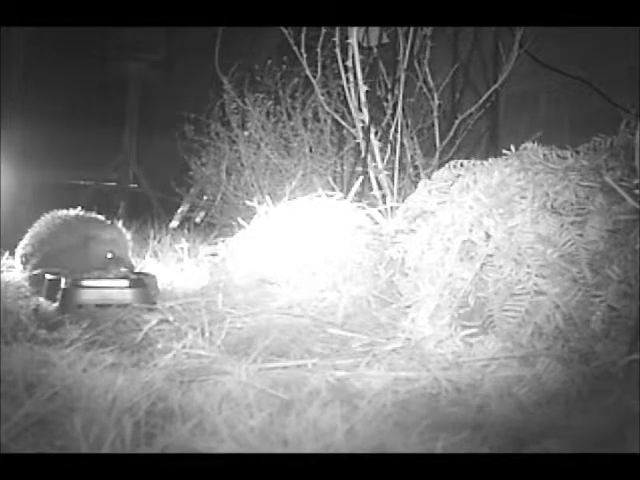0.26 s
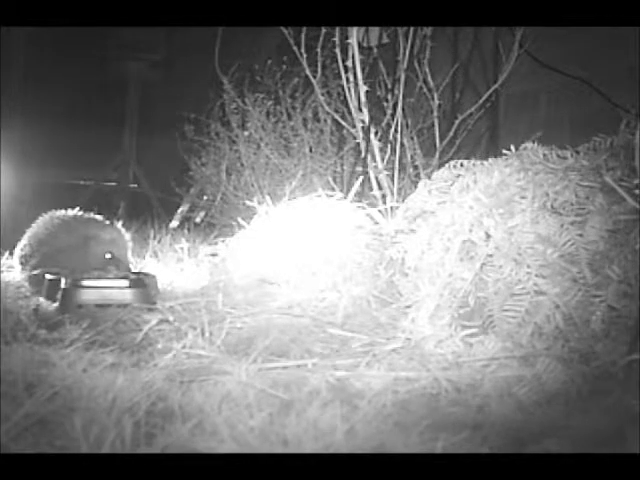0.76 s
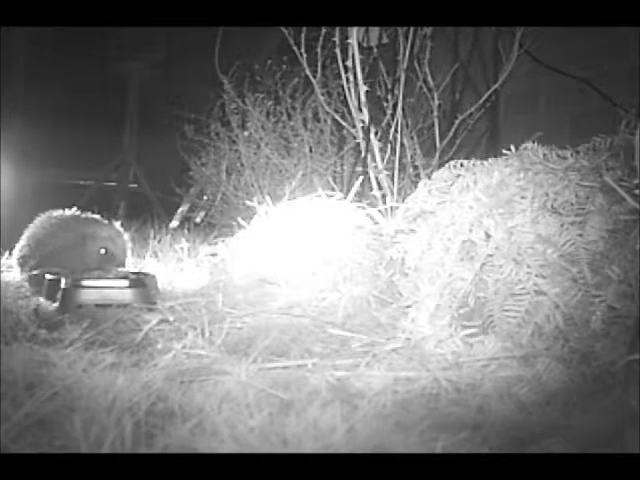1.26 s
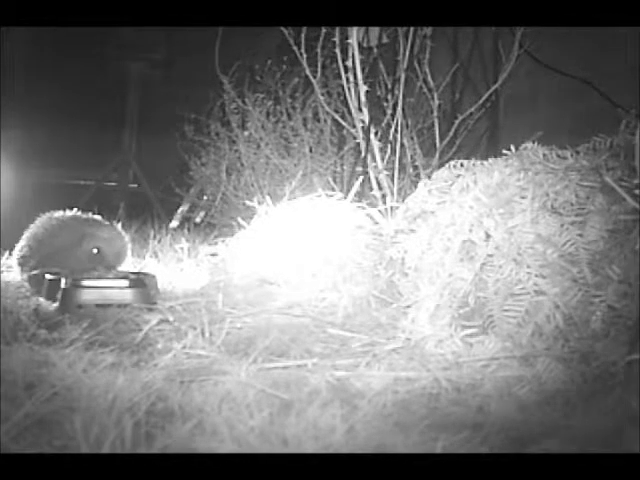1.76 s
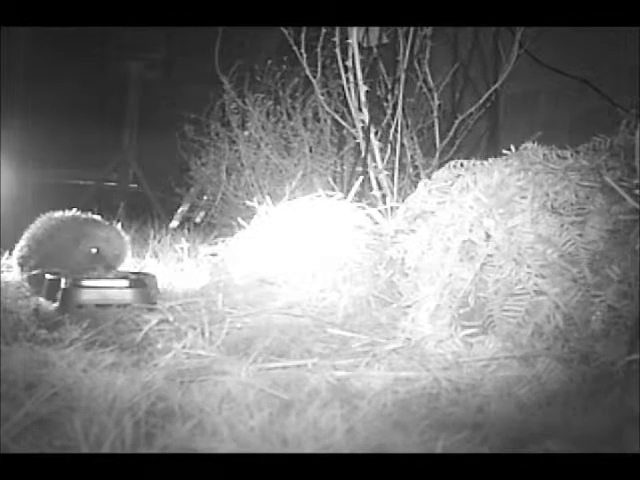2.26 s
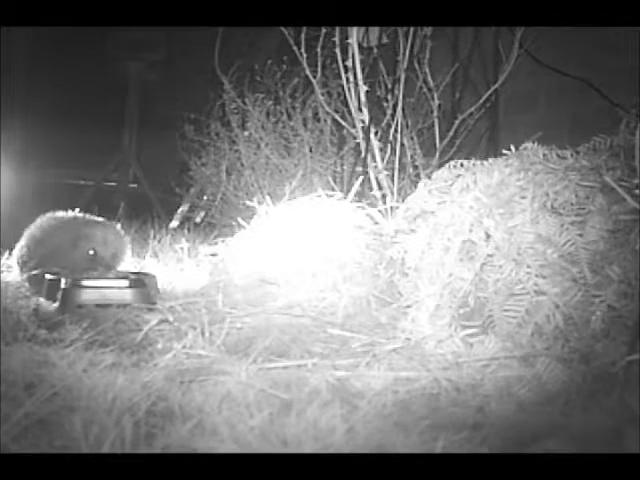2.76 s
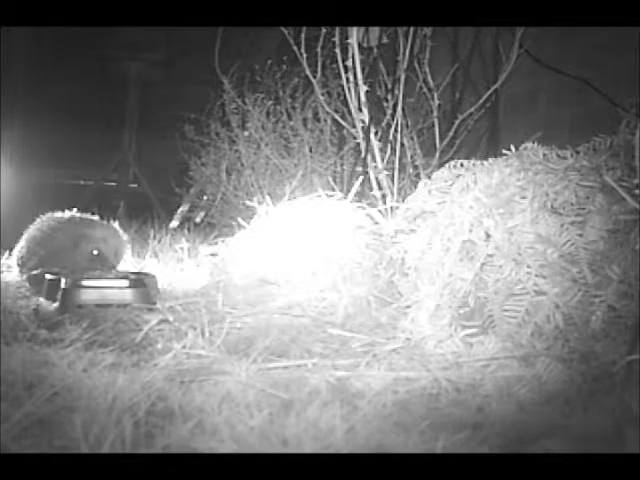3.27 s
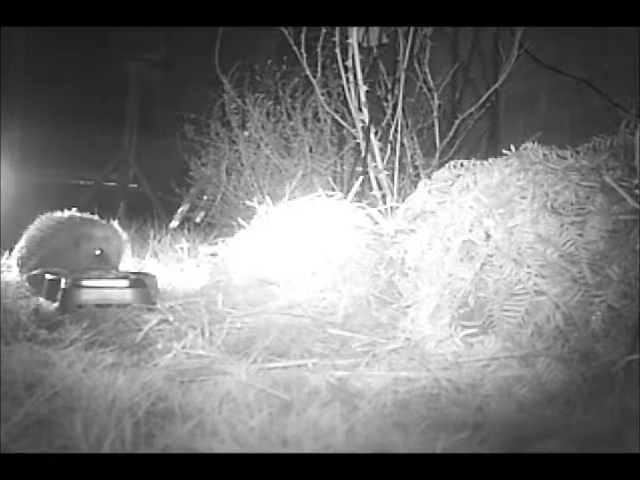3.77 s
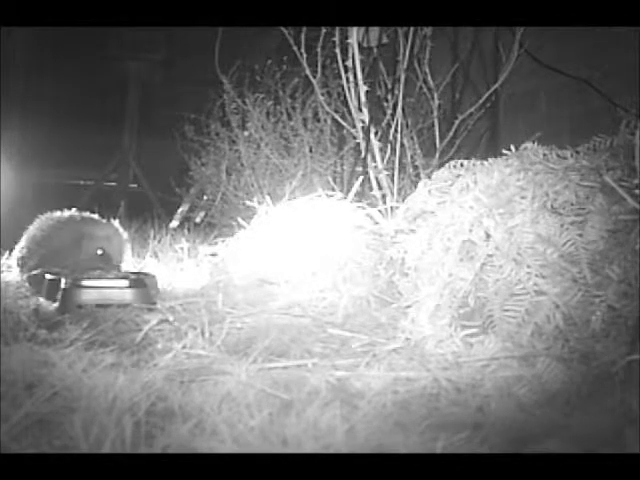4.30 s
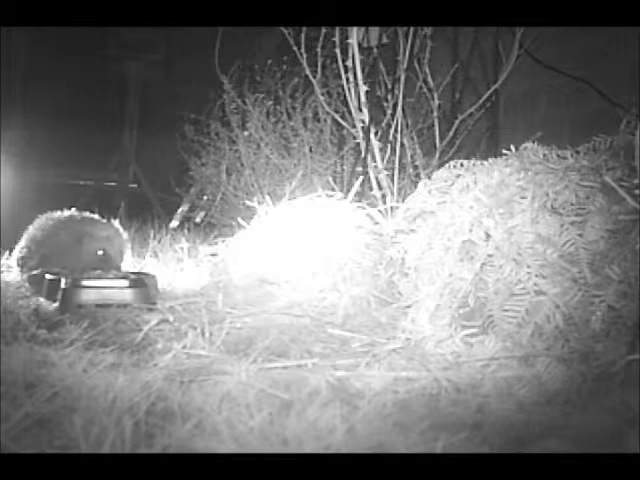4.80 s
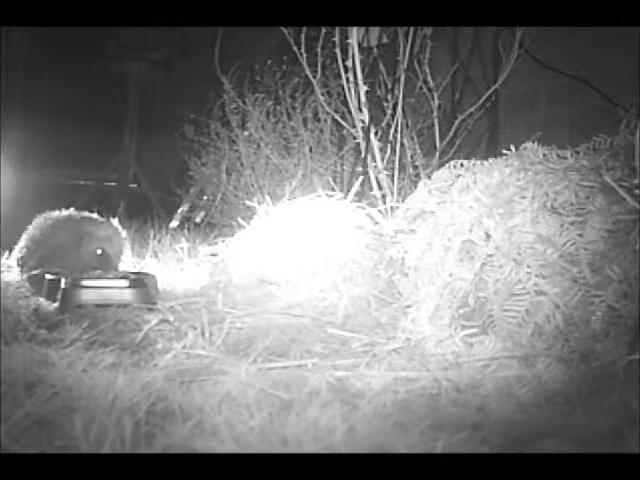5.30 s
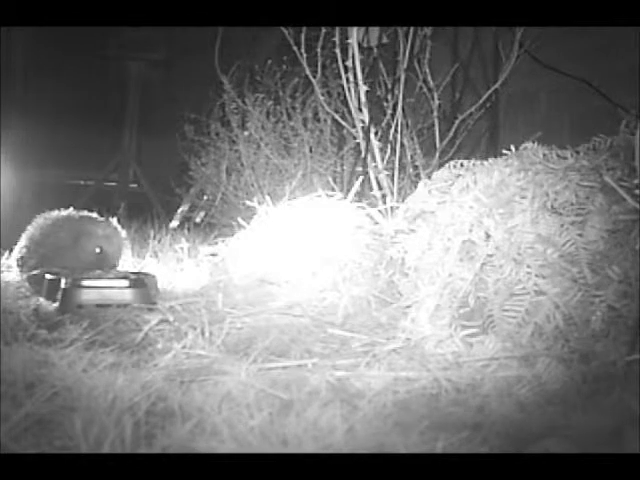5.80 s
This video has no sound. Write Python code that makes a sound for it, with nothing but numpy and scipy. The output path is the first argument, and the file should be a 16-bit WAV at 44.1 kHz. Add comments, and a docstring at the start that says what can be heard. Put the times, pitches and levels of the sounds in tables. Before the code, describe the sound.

Dry, crisp chewing in little bursts, each bite a handful of tiny high cracks with a very short scattered echo. The bites start spaced out, thicken around the middle and continue to the end. Outdoor night air, deep rumble, faint camera hiss and barely audible high whines lie behind, while a far vehicle's low drone and road wash gradually rise. Mono, modest small-camera sound.

```python
"""In a garden at night, a hedgehog crunches dry food from a dish, a few metres from a small camera.
Each bite is a cluster of cracks: brief rings and a sharp click near 4.5 kHz, with a close scattered
echo. The biggest crack has a low body; two sharp wide-band clicks and many faint crumb ticks lie
among the rest. A far engine, a wavering tone with one overtone and rough noise, grows louder along
with road noise. Beneath lie low night rumble, steady air and camera hiss, all shaped noise, and
the thin sine whines of the camera's circuits."""
import sys
import numpy as np
from scipy import signal
from scipy.fft import rfft, irfft, next_fast_len
from scipy.io import wavfile
from scipy.ndimage import uniform_filter1d, map_coordinates

SR = 44100
rng = np.random.default_rng(int(sys.argv[2]) if len(sys.argv) > 2 else 0)


def undo_db(level):
    """Turn decibels back into plain size, where 20 dB means ten times bigger."""
    steps = np.asarray(level, float) / 20
    return 10 ** steps


def transcribe(u):
    """Save the signal u as a 16-bit wav file named by the first command-line argument.

    u: samples, shape (n,) or (channels, n), limited to [-1, 1]; the rate is SR.
    q: integer samples, one column per channel.
    """
    v = np.clip(np.atleast_2d(u).T, -1, 1)
    q = np.round(v * 32767).astype(np.int16)
    wavfile.write(sys.argv[1], SR, q)


N = 266756  # samples

# Cracks of dry food. Each row: start in seconds, crunch frequency in Hz, crunch peak in dB,
# thud peak in dB, snap peak in dB.
CRACKS = [(0.0357, 3270, -51.5, -56, -55.5), (0.298, 2950, -60.5, -78, -83),
          (0.4049, 3050, -41.5, -44, -52), (0.4265, 3350, -61, -69, -82), (0.7566, 3070, -49.5, -59, -69),
          (1.14, 3000, -60, -74, -78), (1.149, 3160, -60, -62, -74), (1.2041, 2680, -44.5, -44, -46.5),
          (1.2303, 3180, -63, -59, -58), (1.35, 3100, -78, -61, -61), (1.507, 3500, -55, -62, -60),
          (1.5128, 2870, -53, -63, -67), (1.631, 3106, -76, -80, -56), (1.7615, 2978, -60, -73, -63),
          (1.8102, 3090, -62, -58, -63), (1.9553, 3060, -73, -75, -62), (2.2158, 3048, -57.5, -66, -82),
          (2.2213, 2840, -63, -64, -85), (2.503, 3750, -52, -63, -63), (2.5155, 4114, -47, -58, -63),
          (2.5627, 3680, -66, -61, -57), (2.6222, 3710, -52, -47.5, -40.5),
          (2.7016, 3120, -42.5, -55, -32.5), (2.7177, 3226, -60, -78, -59), (2.721, 2733, -52, -45.5, -44),
          (2.7306, 3050, -61, -77, -56), (2.7424, 3470, -63, -79, -61), (2.9649, 3805, -45.5, -56, -56.5),
          (2.979, 3290, -58, -64, -74), (2.9868, 3344, -60, -70, -81), (3.1673, 3070, -49, -58, -58),
          (3.1758, 3100, -53.5, -70, -51.5), (3.2335, 2803, -53, -70, -59), (3.253, 3600, -56, -60, -52.5),
          (3.2619, 3156, -64, -70, -61), (3.44, 2603, -63, -69, -76), (3.4463, 3060, -59, -53, -80),
          (3.449, 2812, -45.5, -64, -58), (3.4645, 3020, -55, -69, -71), (3.4748, 2918, -49.5, -51, -57),
          (3.485, 3000, -68, -78, -66), (3.495, 3000, -60, -76, -63), (3.5038, 4070, -57, -70, -63),
          (3.5096, 3530, -60, -78, -71), (3.7307, 3000, -50.5, -64, -62), (3.7332, 3000, -49.5, -67, -64),
          (3.7498, 3040, -58, -65, -85), (3.9284, 3160, -53.5, -78, -74), (3.9519, 3070, -46.5, -51, -45),
          (3.961, 3270, -55, -54, -54), (3.968, 3126, -65, -67, -62), (3.9932, 3823, -56, -63, -57),
          (4.024, 3180, -59, -76, -75), (4.4585, 3042, -50.5, -66, -51), (4.488, 2720, -46.5, -54, -54),
          (4.502, 3907, -57, -68, -63), (4.5292, 2956, -57, -63, -68), (4.6, 3100, -70, -72, -61),
          (4.6922, 3136, -57, -71, -69), (4.697, 2817, -54, -78, -71), (4.7033, 2912, -56, -61, -58),
          (4.7121, 2860, -50.5, -63, -54), (4.7539, 3120, -70, -69, -58), (4.762, 2467, -55.5, -70, -61),
          (4.9648, 2875, -46.5, -58, -62), (4.9977, 3650, -71, -77, -58), (5.0031, 3001, -45.5, -71, -63),
          (5.4303, 3440, -51, -55, -55), (5.4451, 2600, -54, -53, -72), (5.4654, 3097, -58, -71, -74)]
# The rings of a crack, in the order thud, crunch, snap. Each row: cycles until the peak,
# phase drift per sample in rad.
CRACK_RINGS = [(.7, 0.034), (1.1, 0.14), (3.2, 0.15)]
# Spectrum of the sharp click under each crack, centred near 4.5 kHz. Each row: frequency in Hz,
# relative level in dB per Hz.
CLICK_COLOUR = [(400, -12), (1000, -4), (3000, -0.5), (4500, 39), (6500, 18), (13000, -23), (16000, -20)]
# Spectrum of the close echo. Each row: frequency in Hz, relative level in dB.
ECHO_COLOUR = [(600, -20), (1500, -8), (2300, -7), (3200, 0), (5000, -9), (7500, -12), (10000, -8),
               (14000, -14)]
# The low body of the biggest crack, then two sharp wide-band clicks. Each row: start in seconds,
# low ring frequency in Hz, low ring peak in dB, sharp edge peak in dB.
BODY_AND_CLICKS = [(2.7016, 1127, -41.5, -44), (3.39, 1000, -62, -50.5), (5.445, 895, -53.5, -43.5)]
# Spectrum of their sharp edge. Each row: frequency in Hz, relative level in dB per Hz.
EDGE_COLOUR = [(400, -11), (1800, 10), (4000, 4), (6000, -10), (8500, 2), (10800, -16), (13500, -3),
               (16000, -4)]
# The far engine's firing tone, before its random waver. Each row: time in seconds,
# frequency in Hz, level in dB rms.
FIRING_TONE = [(0.0, 62, -61), (0.55, 61.24, -62), (1.05, 60, -58), (1.3, 57.95, -65), (1.67, 59.45, -53.5),
               (1.82, 59.2, -63), (2.07, 60.15, -53), (2.2, 60.5, -66.5), (2.63, 59.44, -52.5),
               (3.54, 60.4, -54), (4.03, 56.53, -55.5), (4.23, 58.3, -47.5), (4.4, 59.2, -60),
               (4.6, 57.9, -45.5), (4.72, 57.2, -48.5), (5.49, 54.8, -42), (5.91, 54.35, -47.5),
               (6.05, 54.7, -42)]
# Spectrum of the rough exhaust noise. Each row: frequency in Hz, relative level in dB per Hz.
EXHAUST_COLOUR = [(30, -15.5), (45, 8), (60, -5), (75, -11.5), (100, -16.5)]
# Far road noise, before its random swells. Each row: time in seconds, rms level in dB of the
# band near 3 kHz.
ROAD_LEVEL = [(0.0, -85), (1.3, -84.5), (2.66, -81.5), (3.05, -80), (4.06, -76.5), (5.63, -73.5),
              (6.05, -74)]
# Spectra of the two road bands. Each row: frequency in Hz, relative level in dB per Hz.
ROAD_HIGH_COLOUR = [(1500, -14), (2100, -12), (2800, -4.5), (3230, -1), (3380, -9.5), (4200, -18),
                    (5500, -21.5), (15000, -19)]
ROAD_LOW_COLOUR = [(300, -10.5), (500, -9), (950, -3), (1200, -7), (1900, -12.5), (2500, -18)]
# Spectra of the deep and upper rumble. Each row: frequency in Hz, relative level in dB per Hz.
RUMBLE_DEEP_COLOUR = [(8, -10), (20, -1), (40, -2), (65, -13), (90, -21.5), (130, -42)]
RUMBLE_UPPER_COLOUR = [(60, -18.5), (90, 0.5), (160, -5.5), (260, -9), (400, -31.5)]
# Spectrum of the air and camera hiss. Each row: frequency in Hz, relative level in dB per Hz.
HISS_COLOUR = [(50, -18.5), (90, -10), (160, -11.5), (240, -13), (350, -12), (700, -18.5), (1400, -31.5),
               (2300, -28), (6200, -31.5), (16000, -34.5)]
# Electronic whines, before their random waver. Each row: frequency in Hz, level in dB rms.
WHINES = [(13631, -95.5), (15622, -94.5), (15676, -100)]

THUD_HZ, SNAP_HZ, SNAP_SPREAD_HZ = 1720, 10660, 190  # the snap scatters about its frequency
SNAP_SAG_HZ_PER_DB, SNAP_SOFT_DB = 36, -42.5  # snaps above this level ring lower
CLICK_UNDER_DB, CLICK_SHARE = 9.5, 0.77  # click lies under a blend of crunch (this share) and snap
LOW_RING_CYCLES = 0.79  # cycles until the low ring of a body or click peaks
OVERTONE_DB, OVERTONE_GROWS = -75, 0.12  # second harmonic: mean level, share of the tone's swells
ROAD_LOW_DB, ROAD_LOW_GROWS = -71.5, 0.22  # lower road band: mean level, share of the rise
DEEP_DB, UPPER_DB = -51.5, -64  # rms of the deep rumble, and of the upper rumble at the start
UPPER_FADES_DB_PER_S = 0.42


def curves(rows):
    """Linear interpolation: one value per sample for each column after the time."""
    seconds, *columns = np.transpose(rows)
    return [np.interp(np.arange(N) / SR, seconds, column) for column in columns]


def gains(points, size):
    """Spectral envelope: gain on the FFT grid, interpolated in dB over log frequency."""
    hz, db = np.transpose(points)
    grid_hz = np.fft.rfftfreq(size, 1 / SR) + 1
    return undo_db(np.interp(np.log(grid_hz), np.log(hz), db, left=-120, right=-120))


def noise(colour):
    """Filtered noise: a white spectrum times an envelope, scaled to rms 1."""
    size = next_fast_len(N + 8192)
    white = rng.standard_normal(size)
    shaped = irfft(rfft(white) * gains(colour, size), size)[:N]
    return shaped / np.std(shaped)


def causal(colour, size=1024):
    """Minimum phase: folding the cepstrum gathers energy at the onset of an impulse of peak 1."""
    cepstrum = irfft(np.log(gains(colour, size) + 1e-4), size)
    cepstrum[1:size // 2] *= 2
    cepstrum[size // 2 + 1:] = 0
    pulse = irfft(np.exp(rfft(cepstrum)), size)[:size // 2]
    return pulse / np.abs(pulse).max()


def wobble(rate):
    """Slow random modulation: a smooth curve through random knots, rate of them a second."""
    knots = rng.standard_normal(int(N * rate / SR) + 4)
    return map_coordinates(knots, [np.arange(N) * rate / SR])


def swelling_ring(t, hz, cycles, phase=0):
    """Damped resonance: a sine whose envelope peaks at 1 after the given cycles, then dies."""
    age = t * hz / cycles
    return age * np.exp(1 - age) * np.sin(2 * np.pi * hz * t + phase)


def chewing():
    """Superposition: cracks, low body and clicks, each with its own echo, add to the fine crumbs."""
    out = np.zeros(N + SR)
    sounds = []
    for start, crunch_hz, crunch_db, thud_db, snap_db in CRACKS:
        snap_hz = SNAP_HZ - SNAP_SAG_HZ_PER_DB * max(snap_db - SNAP_SOFT_DB, 0)
        snap_hz += SNAP_SPREAD_HZ * rng.standard_normal()
        rings = [(THUD_HZ, thud_db), (crunch_hz, crunch_db), (snap_hz, snap_db)]
        click_db = CLICK_SHARE * crunch_db + (1 - CLICK_SHARE) * snap_db - CLICK_UNDER_DB
        sounds.append((start, crack(rings, click_db)))
    for start, *row in BODY_AND_CLICKS:
        sounds.append((start, body_or_click(*row)))
    for start, sound in sounds:
        sound = signal.fftconvolve(sound, echo(start=.0028, t60=.028, db=-13))
        out[round(start * SR):][:len(sound)] += sound
    return out[:N] + crumbs()


def crack(rings, click_db):
    """Brittle fracture: three rings swell and die within a millisecond or two, over a sharp click."""
    t = np.arange(SR // 100) / SR
    out = -undo_db(click_db) * causal(CLICK_COLOUR)[:len(t)]
    for k, ((hz, db), (cycles, rough)) in enumerate(zip(rings, CRACK_RINGS)):
        drift = np.cumsum(rng.standard_normal(len(t))) * rough  # a brittle ring loses its phase fast
        # neighbouring rings start a quarter cycle apart, so the band between them only dips
        out += undo_db(db) * swelling_ring(t, hz, cycles, k * np.pi / 2 + drift)
    return out


def body_or_click(hz, db, edge_db):
    """Transient: a short low ring plus a sharp wide-band edge; the stronger part sets the character."""
    t = np.arange(SR // 100) / SR
    ring = undo_db(db) * swelling_ring(t, hz, LOW_RING_CYCLES)
    return ring + undo_db(edge_db) * causal(EDGE_COLOUR)[:len(t)]


def echo(start, t60, db):
    """Scattering: ground and dish return the sound a few ms later, differently each time."""
    t = np.arange(SR // 20) / SR
    decay = (t > start) * undo_db(-60 * (t - start) / t60)
    tail = np.convolve(decay * rng.standard_normal(len(t)), causal(ECHO_COLOUR))[:len(t)]
    tail *= undo_db(db) / np.linalg.norm(tail)  # energy relative to the direct sound
    tail[0] += 1  # the direct sound
    return tail


def crumbs():
    """Small random fractures: three faint ticks around each crack, mostly lost in the hiss."""
    out = np.zeros(N + SR)
    for start, *_ in CRACKS:
        for late, size, high, mid in rng.random((3, 4)):
            db = -68 + 6 * size
            rings = [(1600, db - 20),
                     (2700 + 1300 * mid, db - 14 * high),
                     (10600, db - 14 * (1 - high))]
            tick = crack(rings, db - 12)
            first = max(round((start - .01 + .04 * late) * SR), 0)
            out[first:][:len(tick)] += tick
    return out[:N]


def engine():
    """Periodic firing: a wavering tone and its second harmonic, with rough exhaust noise around."""
    hz, db = curves(FIRING_TONE)
    waver_hz = .9 * wobble(8)
    phase = 2 * np.pi * np.cumsum(hz + waver_hz) / SR
    tone = np.sqrt(2) * undo_db(db + 1.1 * wobble(7)) * np.sin(phase)
    overtone_db = OVERTONE_DB + OVERTONE_GROWS * (db - db.mean()) + 4.5 * wobble(4)
    overtone = undo_db(overtone_db) * np.sin(2 * phase)  # this level is a peak, not an rms
    exhaust_db = uniform_filter1d(db, size=SR // 2) - 9.0  # follows the tone over half a second
    return tone + overtone + undo_db(exhaust_db) * noise(EXHAUST_COLOUR)


def road():
    """Broadband noise in two bands: both rise together, the lower one by a smaller share."""
    high_db, = curves(ROAD_LEVEL)
    low_db = ROAD_LOW_DB + ROAD_LOW_GROWS * (high_db - high_db.mean())
    high = undo_db(high_db + 1.4 * wobble(12)) * noise(ROAD_HIGH_COLOUR)
    return high + undo_db(low_db) * noise(ROAD_LOW_COLOUR)


def rumble():
    """Amplitude-modulated low noise: uneven swells, with the upper part slowly fading."""
    t = np.arange(N) / SR
    deep_db = DEEP_DB + 0.65 * wobble(3.06)
    upper_db = UPPER_DB - UPPER_FADES_DB_PER_S * t + 0.98 * wobble(4.5)
    return undo_db(deep_db) * noise(RUMBLE_DEEP_COLOUR) + undo_db(upper_db) * noise(RUMBLE_UPPER_COLOUR)


def hiss():
    """Stationary random noise: the steady hiss of the air and the camera."""
    return undo_db(-67.5) * noise(HISS_COLOUR)


def whines():
    """Electrical oscillation: thin sines of the camera's circuits, wavering in level and phase."""
    t = np.arange(N) / SR
    out = np.zeros(N)
    for hz, db in WHINES:
        level = np.sqrt(2) * undo_db(db + 1.5 * wobble(5.0))
        out += level * np.sin(2 * np.pi * hz * t + 1.2 * wobble(12))
    return out


def scene():
    """Linear superposition of all sources, in one channel."""
    return (chewing() + engine() + road() + rumble() + hiss() + whines())[None]


def top_cut(x):
    """Nothing passes above the cut-off."""
    return signal.sosfilt(signal.butter(12, 16460, fs=SR, output="sos"), x)


def record(dry):
    """Band limitation: the camera passes only frequencies below 15860 Hz."""
    size = next_fast_len(N + 8192)
    passed = np.fft.rfftfreq(size, 1 / SR) < 15860
    finished = irfft(rfft(dry, size) * passed, size)[:, :N]
    return top_cut(finished)


dry = scene()
out = record(dry)
transcribe(out)
```